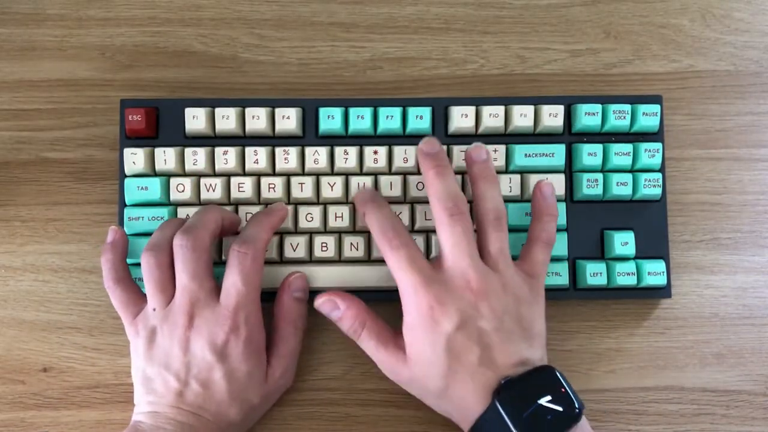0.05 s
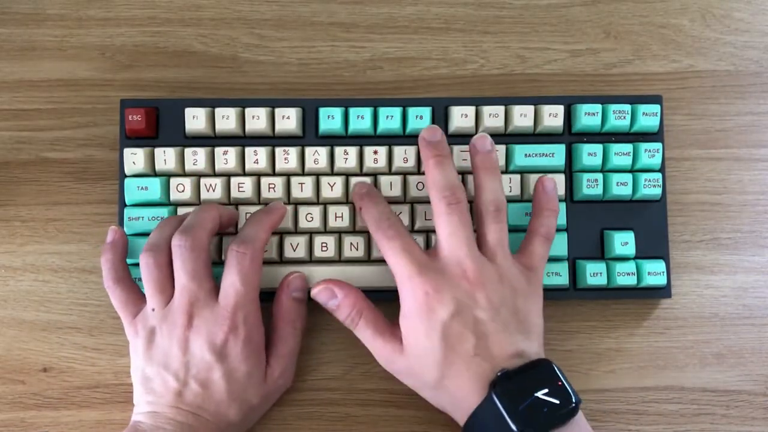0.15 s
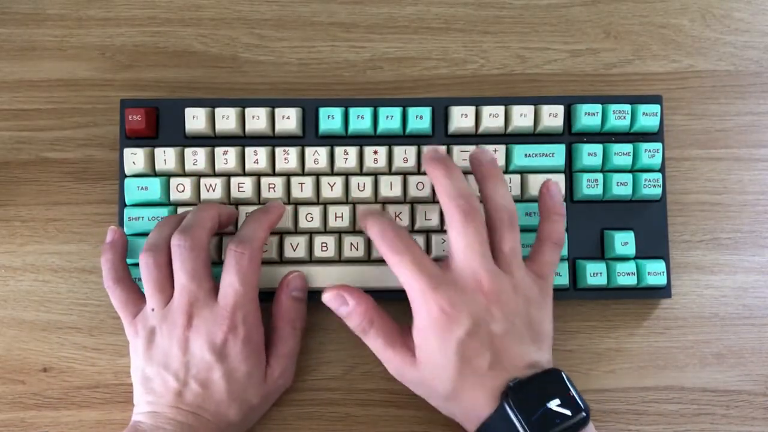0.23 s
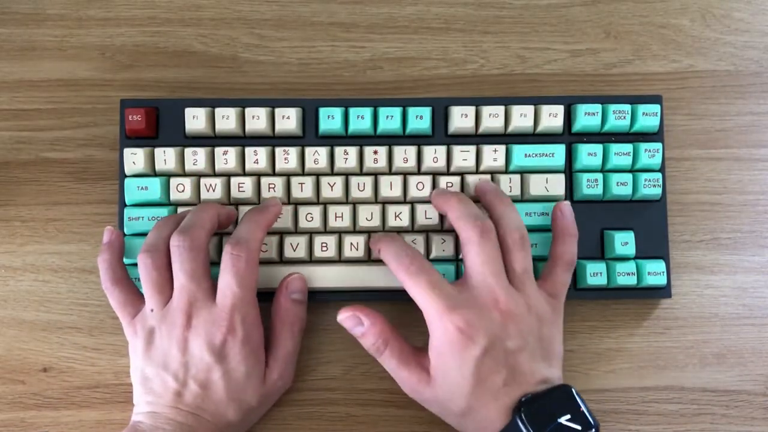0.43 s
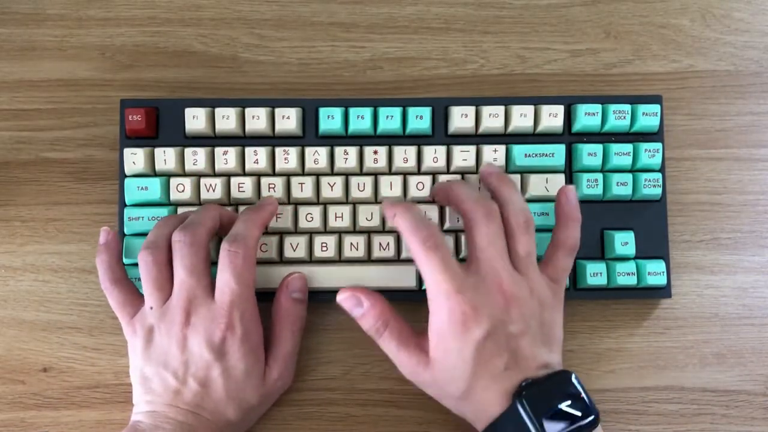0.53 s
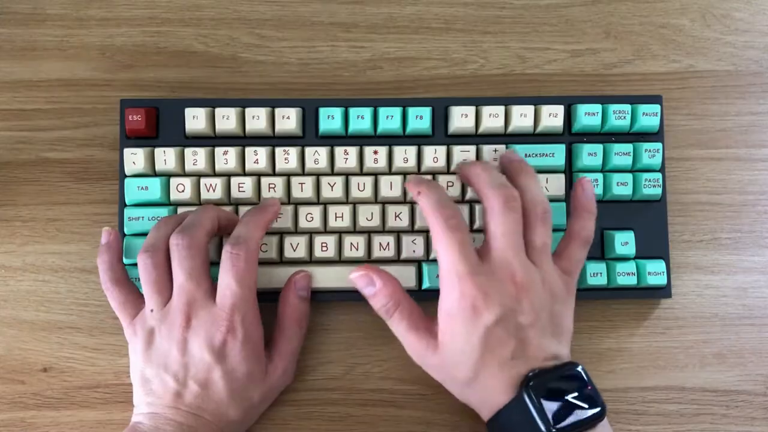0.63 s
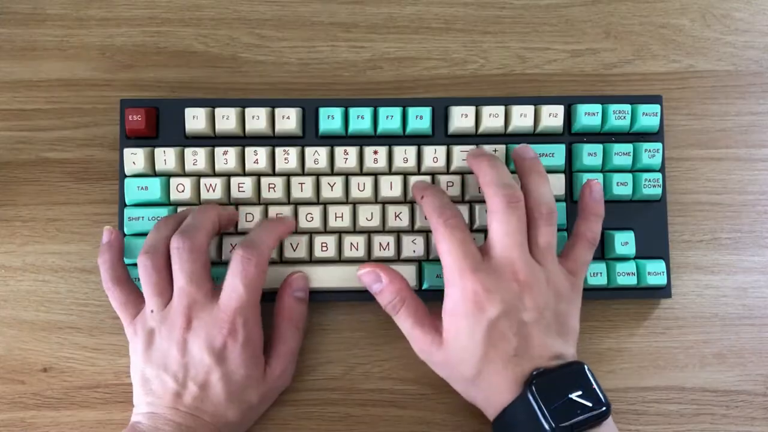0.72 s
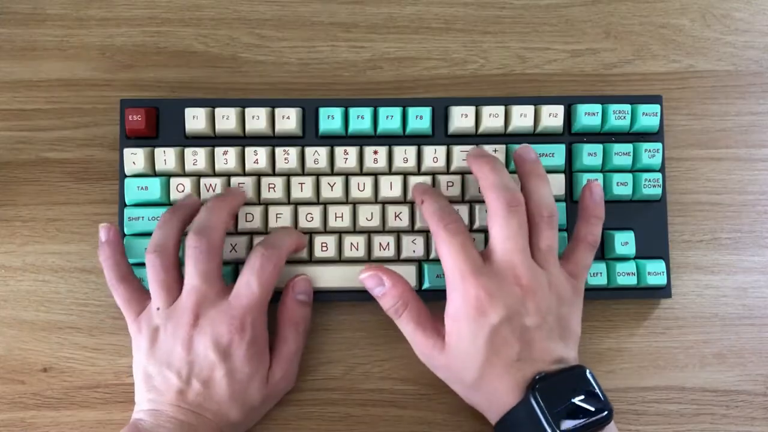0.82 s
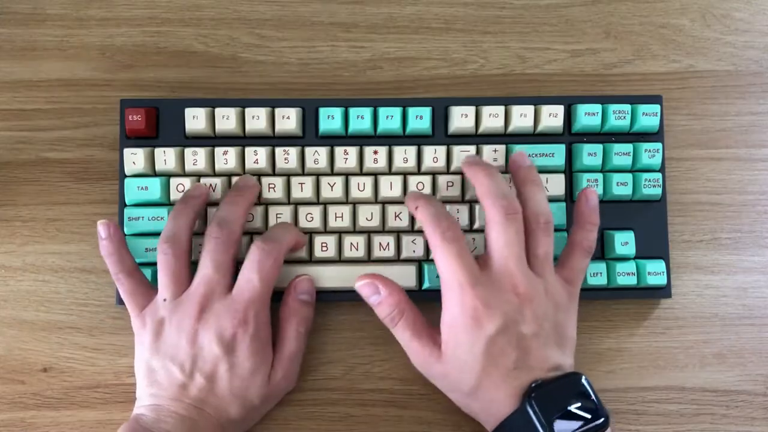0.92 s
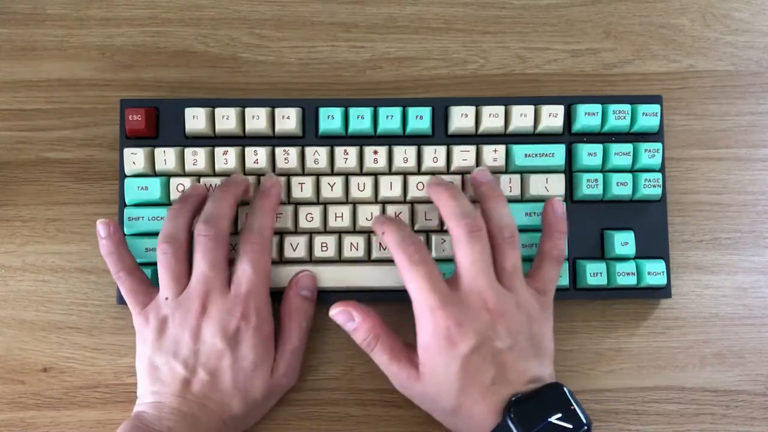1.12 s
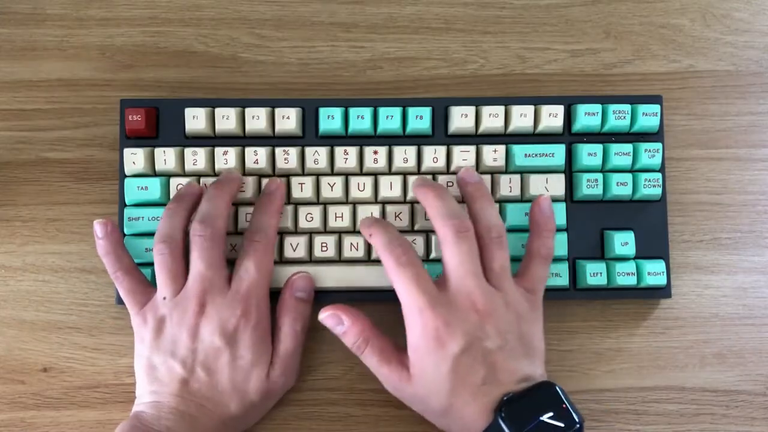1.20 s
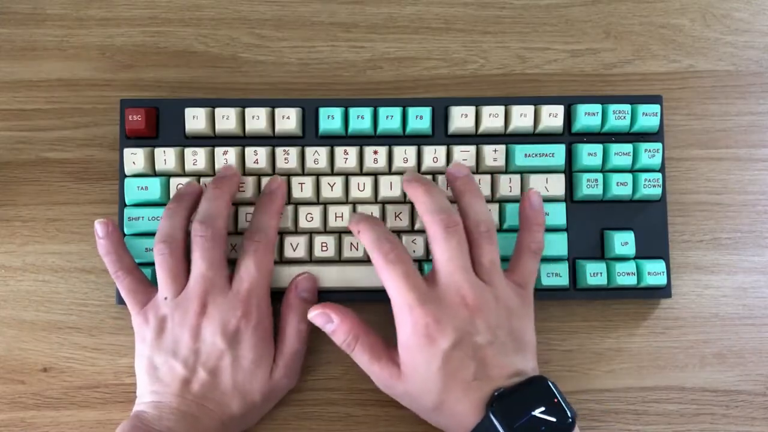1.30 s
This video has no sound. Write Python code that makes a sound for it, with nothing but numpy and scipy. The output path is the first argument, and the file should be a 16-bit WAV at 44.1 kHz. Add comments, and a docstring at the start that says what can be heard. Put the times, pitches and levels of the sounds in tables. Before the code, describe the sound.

A mechanical keyboard is typed on quickly, bright snaps and plastic keycap knocks in uneven clusters, with faint spring ringing and low wooden desk thumps; close, dry indoor pickup with low room tone.

```python
"""Fast typing on a clicky mechanical keyboard on a wooden desk in a quiet room.
Clicks: noise bursts through two resonances plus hiss, with a spring that sings on. Clacks: ragged blows
ringing keycap, case and plate, over low modes of tray and desk. Rustle and room tone: shaped noise.
The desk top booms; one wide key leaves a thin ring. A faint twin leads every sound by 17 ms.
The sound stops at 1.2 s."""
import sys
import numpy as np
from scipy import signal
from scipy.fft import rfft, irfft
from scipy.io import wavfile
from scipy.ndimage import uniform_filter1d

SR = 44100
rng = np.random.default_rng(int(sys.argv[2]) if len(sys.argv) > 2 else 0)


def unload_audio(sound):
    """Save the sound as a 16-bit wav file, at the path given as the first command line argument."""
    columns = np.transpose(np.atleast_2d(sound))
    # keep every value between -1 and 1, then stretch to whole-number steps
    steps = np.round(np.clip(columns, -1, 1) * 32767)
    wavfile.write(sys.argv[1], SR, steps.astype(np.int16))


N = 59535

# Room tone spectrum. Each row: frequency [Hz], relative density [dB per Hz].
ROOM_TONE_SPECTRUM = [(25, -4.5), (50, -2.5), (70, -17), (100, -12.5), (125, -11), (170, -20), (250, -15),
                      (500, -28), (800, -25), (2000, -34.5), (4000, -40), (8000, -54), (16000, -70)]
# Boom of the desk top as the hands shake it. Each row: time [s], rms level [dB], frequency [Hz].
DESK_BOOM = [(0.0, -44.5, 63.6), (0.032, -47, 60.4), (0.174, -63.5, 65.9), (0.278, -48.5, 64.3),
             (0.37, -60, 65.7), (0.4, -43.5, 64.7), (0.56, -52.5, 66.35), (0.586, -71, 65),
             (0.626, -45, 65.7), (0.692, -48, 64.65), (0.724, -57, 67.4), (0.824, -48.5, 64.4),
             (0.878, -56.5, 63), (0.934, -46.5, 64.5), (1.01, -70, 63.1), (1.06, -54.5, 60.8),
             (1.112, -46, 62.7), (1.19, -55.5, 65.5)]
# Switch clicks and rattles. Each row: start [s], peak of a sine with the energy of the high ring [dB],
# high ring [Hz], low ring level re high [dB], low ring [Hz], t60 [s].
SWITCH_CLICKS = [(0.014, -54.5, 8100, 10.5, 7700, 0.035), (0.0265, -54, 9700, 13, 4760, 0.038),
                 (0.237, -33.5, 12300, 2, 3980, 0.011), (0.2446, -19.5, 10670, -10.5, 5800, 0.015),
                 (0.319, -32.5, 11300, -4, 6460, 0.012), (0.325, -39, 12200, 11.5, 4070, 0.034),
                 (0.38, -26, 13000, -16, 6640, 0.035), (0.3815, -20.5, 10270, -7, 5132, 0.024),
                 (0.3912, -51, 10320, 12, 6680, 0.028), (0.412, -62, 12970, 15, 5300, 0.023),
                 (0.4717, -44, 9700, 3, 3900, 0.047), (0.4792, -32, 11870, 9.5, 5360, 0.0074),
                 (0.499, -31, 11400, -3, 5240, 0.024), (0.501, -23.5, 12130, -20, 6390, 0.012),
                 (0.5052, -16, 11650, -3.5, 5230, 0.0062), (0.5085, -35, 11230, 1, 7390, 0.024),
                 (0.515, -34, 10480, -2, 4077, 0.033), (0.6193, -24.5, 12530, -26, 5590, 0.03),
                 (0.622, -33, 12200, 4.5, 5800, 0.025), (0.6285, -7, 10090, -3, 5440, 0.012),
                 (0.6292, -27, 12340, -7.5, 7810, 0.017), (0.7475, -47, 9400, 11, 5500, 0.012),
                 (0.752, -25.5, 10400, 8.5, 5860, 0.0074), (0.7545, -48.5, 10300, 8, 3900, 0.0089),
                 (0.799, -44.5, 12940, 20.5, 5770, 0.0053), (0.802, -60.5, 12000, 4, 5390, 0.0092),
                 (0.8868, -24.5, 11820, -4.5, 5376, 0.018), (0.8908, -23.5, 10360, -0.5, 3945, 0.029),
                 (0.9543, -35.5, 10010, 6.5, 5940, 0.0075), (0.961, -38.5, 11160, 8.5, 5225, 0.015),
                 (1.0318, -36.5, 13870, -3, 4640, 0.019), (1.039, -40, 11000, 1.5, 5040, 0.0091),
                 (1.0454, -24, 10850, 3, 5410, 0.01), (1.13, -34, 11630, 5, 5730, 0.0073),
                 (1.135, -32, 11620, 0.5, 4650, 0.03), (1.145, -41.5, 13960, 3, 5900, 0.014),
                 (1.1516, -33.5, 9820, 5, 5110, 0.014), (1.161, -17.5, 14070, -7.5, 6950, 0.012),
                 (1.178, -34, 9930, 6.5, 5590, 0.0074)]
# Keycaps landing. Each row: start [s], nominal cap peak [dB], cap [Hz], cap t60 [s], second ring [Hz],
# second ring re cap [dB], case re cap [dB], chatter share of blow energy [0-1], desk thud [dB], tray [dB].
KEYCAP_LANDINGS = [(0.0282, -44.5, 1937, 0.048, 2920, 14.5, 2, 0.9, -44, -46),
                   (0.2525, -20, 2020, 0.012, 3000, 7.5, -7.5, 0.13, -45, -48),
                   (0.327, -26, 2120, 0.016, 2940, -27, 4, 0.6, -36, -41),
                   (0.334, -36, 2070, 0.016, 2870, -7, 1.5, 0.6, -48, -46),
                   (0.391, -19, 1890, 0.019, 3056, 4.5, -4, 0.3, -42.5, -47.5),
                   (0.481, -36, 2290, 0.0064, 3460, -3, -2, 0.2, -55, -40),
                   (0.483, -33, 2030, 0.0053, 3000, 6, 4, 0.4, -41.5, -75),
                   (0.495, -34, 1904, 0.016, 2660, -17, -3, 0.9, -51, -40.5),
                   (0.511, -22, 2540, 0.0079, 2763, -8, -1, 0.6, -44, -43.5),
                   (0.6279, -24, 1899, 0.054, 3720, -15, 2, 1, -39.5, -41.5),
                   (0.6367, -12, 1887, 0.035, 2612, -12, -13, 0.63, -33, -32.5),
                   (0.7624, -19, 1880, 0.016, 3326, 4, -13.5, 0, -40, -43),
                   (0.802, -38, 1970, 0.039, 3330, -6, -1, 0.4, -42.5, -47),
                   (0.897, -19, 2030, 0.0083, 2546, 4.5, -0.5, 0.37, -38, -36),
                   (0.962, -33, 2200, 0.011, 2620, 5.5, -1, 0.64, -42.5, -42.5),
                   (1.033, -40.5, 2050, 0.015, 2720, 11, -1.5, 0.8, -45.5, -51.5),
                   (1.056, -18.5, 1775, 0.017, 3300, 0, -15, 0.45, -44, -45.5),
                   (1.138, -34.5, 2424, 0.031, 3100, -5, -4.5, 0.9, -42, -36.5),
                   (1.1746, -14, 2040, 0.01, 3402, -15.5, -18, 0.29, -47, -57.5)]
# Modes of case and plate, of the desk, and of the tray under the keys.
# Each row: nominal frequency [Hz], nominal relative level [dB], t60 [s].
CASE_MODES = [(999, -5, 0.017), (1157, -8, 0.032), (1306, -5, 0.01), (1616, -2.5, 0.014),
              (2484, -1.5, 0.0061), (2750, -12, 0.0083), (3010, 5.5, 0.005), (4460, -8, 0.015),
              (5500, -10, 0.013)]
DESK_MODES = [(116.7, -5, 0.13), (177, 2, 0.071), (239.8, -10.5, .12)]
TRAY_MODES = [(339.2, -2.5, 0.18), (406, -1, 0.071), (577, -12.5, 0.061), (782, -9.5, 0.18)]
# Spectrum of the rustle that trails the keys. Each row: frequency [Hz], relative density [dB per Hz].
RUSTLE_SPECTRUM = [(500, -9), (900, -2.5), (1600, -2.5), (2300, -2), (3200, 0.5), (4200, -11.5),
                   (6500, -15.5), (10000, -26.5), (16000, -26.5)]
# Thin ring left behind by one wide key. Each row: start [s], level before its onset and decay [dB].
WIDE_KEY_RINGS = [(0.611, -44), (.639, -30.5), (.765, -46), (.803, -42.5)]

ROOM_TONE_DB = -52
HISS_DB, HIGH_WIDTH_HZ, LOW_WIDTH_HZ, CLICK_RISE_S = -11.5, 300, 1500, 0.00016
SPRING_HZ, SPRING_T60_S, SPRING_REACH_HZ = 10310, 0.23, 1500
SPRING_DB, SPRING_DB_PER_CLICK_DB = -37, 0.65  # SPRING_DB: at a 0 dB click on the spring's pitch
SECOND_T60_S, CHATTER_T60_S, THUD_RISE_S = 0.0078, 0.014, 0.011
KNOCK_DB, KNOCK_T60_S, CLACK_HIGHPASS_HZ = -10.5, 0.0066, 787
ROOM_DB, ROOM_T60_S, ROOM_RISE_S, ROOM_LOW_HZ, ROOM_TOP_HZ = -28, 0.3, 0.0071, 500, 4000
RUSTLE_DB, RUSTLE_GROWTH, RUSTLE_T60_S = -25.5, 0.6, 0.22  # growth: rustle dB per key dB
RING_HZ, RING_T60_S, RING_RISE_S = 1910, 0.13, 0.002
TWIN_DB, TWIN_LEAD_S, END_S, TOP_HZ = -12.5, 768 / 44100, 1.1982, 15800


def undb(db):
    """Amplitude from dB."""
    return 10 ** (np.asarray(db) / 20)


def seconds(duration_s):
    """Time axis in seconds."""
    return np.arange(int(duration_s * SR)) / SR


def fall(t, t60_s):
    """Exponential decay by 60 dB in t60_s."""
    return np.exp(-np.log(1000) * t / t60_s)


def rise(t, rise_s):
    """Exponential onset with time constant rise_s."""
    return 1 - np.exp(-t / rise_s)


def add(out, start_s, x):
    """Mix x into out from start_s, cut at the end of out."""
    k = int(start_s * SR)
    x = x[:N - k]
    out[k:k + len(x)] += x


def resonant_noise(n, hz, width_hz):
    """White noise through one resonance, at unit rms."""
    b, a = signal.iirpeak(hz, hz / width_hz, fs=SR)
    y = signal.lfilter(b, a, rng.standard_normal(n))
    return y / np.std(y)


def burst(noise, envelope):
    """Enveloped noise with about the energy of a unit-peak sine under that envelope."""
    shaped = noise * envelope
    return shaped * np.sqrt(np.sum(envelope ** 2) / np.sum(shaped ** 2) / 2)


def coloured_noise(spectrum):
    """Steady noise of unit rms; density interpolated over log frequency."""
    hz = np.arange(N // 2 + 1) * SR / N
    point_hz, point_db = np.array(spectrum).T
    gain = undb(np.interp(np.log(hz + 1), np.log(point_hz), point_db))
    x = irfft(rfft(rng.standard_normal(N)) * gain, N)
    return x / np.std(x)


def modes(table, t):
    """Fading sines after one blow, neighbours in opposite phase, level and pitch varying per blow."""
    out = np.zeros(len(t))
    for k, (hz, db, t60_s) in enumerate(table):
        level_luck, pitch_luck = rng.standard_normal(2)
        level = undb(db + 1.5 * level_luck)
        sine = np.sin(2 * np.pi * hz * (1 + 0.014 * pitch_luck) * t)
        out += (-1) ** k * level * fall(t, t60_s) * sine
    return out


def struck(blow, table, t):
    """Modes rung by a ragged blow, each keeping the energy one clean blow gives it."""
    out = np.zeros(len(t))
    for k, row in enumerate(table):
        clean = modes([row], t)
        rung = signal.fftconvolve(blow, clean)[:len(t)]
        out += (-1) ** k * rung * np.sqrt(np.sum(clean ** 2) / np.sum(rung ** 2))
    return out


def room_tone():
    """Steady noise, densest in the bass."""
    return undb(ROOM_TONE_DB) * coloured_noise(ROOM_TONE_SPECTRUM)


def desk_boom():
    """Lowest mode of the desk top: one sine that swells, sinks and drifts in pitch."""
    at_s, db, hz = np.array(DESK_BOOM).T
    t = np.arange(N) / SR
    phase = 2 * np.pi * np.cumsum(np.interp(t, at_s, hz)) / SR
    level = np.sqrt(2) * undb(np.interp(t, at_s, db))
    return level * np.sin(phase + 2 * np.pi * rng.random())


def spring(click_db, click_hz):
    """Spring singing on after a click, stronger for loud clicks near its pitch."""
    t = seconds(0.2)
    level = undb(SPRING_DB_PER_CLICK_DB * click_db + SPRING_DB)
    coupling = 1 / (1 + ((click_hz - SPRING_HZ) / SPRING_REACH_HZ) ** 2)
    return level * coupling * fall(t, SPRING_T60_S) * resonant_noise(len(t), SPRING_HZ, 250)


def clicks():
    """Short rattles ring two small resonances over broad hiss, and excite the spring."""
    out, t = np.zeros(N), seconds(0.05)
    for start_s, db, high_hz, low_db, low_hz, t60_s in SWITCH_CLICKS:
        envelope = rise(t, CLICK_RISE_S) * fall(t, t60_s)
        high = burst(resonant_noise(len(t), high_hz, HIGH_WIDTH_HZ), envelope)
        low = undb(low_db) * burst(resonant_noise(len(t), low_hz, LOW_WIDTH_HZ), envelope)
        hiss = undb(HISS_DB) * burst(resonant_noise(len(t), 11000, 11000), envelope)
        add(out, start_s, undb(db) * (high + low + hiss))
        add(out, start_s, spring(db, high_hz))
    return out


def ragged_blow(t, chatter):
    """Unit impulse sharing its energy with a fading chatter of small contacts."""
    blow = rng.standard_normal(len(t)) ** 3 * fall(t, CHATTER_T60_S)  # cubed: sparse peaks
    blow *= np.sqrt(chatter / np.sum(blow ** 2))
    blow[0] += np.sqrt(1 - chatter)
    return blow


def clacks():
    """Landing blows ring cap and case with a noise knock; highpassed."""
    out, t = np.zeros(N), seconds(0.1)
    for start_s, db, hz, t60_s, second_hz, second_db, case_db, chatter, _, _ in KEYCAP_LANDINGS:
        blow = ragged_blow(t, chatter)
        cap = struck(blow, [(hz, 0, t60_s), (second_hz, second_db, SECOND_T60_S)], t)
        case = undb(case_db) * struck(blow, CASE_MODES, t)
        knock = undb(KNOCK_DB) * burst(resonant_noise(len(t), 6000, 9000), fall(t, KNOCK_T60_S))
        add(out, start_s, -undb(db) * (cap + case + knock))
    highpass = signal.butter(3, CLACK_HIGHPASS_HZ, "highpass", fs=SR, output="sos")
    return signal.sosfilt(highpass, out)


def thuds():
    """Each landing rings the low modes of desk and tray with a soft onset."""
    out, t = np.zeros(N), seconds(0.5)
    for row in KEYCAP_LANDINGS:
        start_s, desk_db, tray_db = row[0], row[-2], row[-1]
        low = undb(desk_db) * modes(DESK_MODES, t) + undb(tray_db) * modes(TRAY_MODES, t)
        add(out, start_s, low * rise(t, THUD_RISE_S))
    return out


def room_tail(keys):
    """Keys convolved with fading bandpassed noise of unit energy."""
    t = seconds(0.5)
    b, a = signal.butter(1, [ROOM_LOW_HZ, ROOM_TOP_HZ], "bandpass", fs=SR)
    tail = signal.lfilter(b, a, rng.standard_normal(len(t))) * fall(t, ROOM_T60_S)
    tail *= np.clip(t / ROOM_RISE_S, 0, 1)
    tail /= np.sqrt(np.sum(tail ** 2))
    return undb(ROOM_DB) * signal.fftconvolve(keys, tail)[:N]


def rustle(keys):
    """Diffuse noise trailing the keys; its level grows more slowly than theirs."""
    smooth_power = np.maximum(uniform_filter1d(keys ** 2, size=128), 0)  # no negative rounding
    tail = fall(seconds(0.5), RUSTLE_T60_S) ** 2
    power = signal.fftconvolve(smooth_power ** RUSTLE_GROWTH, tail / np.sum(tail))[:N]
    return undb(RUSTLE_DB) * np.sqrt(np.abs(power)) * coloured_noise(RUSTLE_SPECTRUM)


def rings():
    """One clean sine per ring, with a fast onset and long decay."""
    out, t = np.zeros(N), seconds(0.25)
    tone = rise(t, RING_RISE_S) * fall(t, RING_T60_S) * np.sin(2 * np.pi * RING_HZ * t)
    for start_s, db in WIDE_KEY_RINGS:
        add(out, start_s, undb(db) * tone)
    return out


def scene():
    """Keys with room tail and rustle, wide-key rings, desk and room tone; one channel."""
    keys = clicks() + clacks()
    desk = thuds() + desk_boom()
    return (room_tone() + desk + keys + room_tail(keys) + rustle(keys) + rings())[None]


def record(dry):
    """Add the faint early twin, stop at END_S, lowpass at TOP_HZ."""
    lead = round(TWIN_LEAD_S * SR)
    twin = undb(TWIN_DB) * np.pad(dry[:, lead:], ((0, 0), (0, lead)))
    stopped = (dry + twin) * (np.arange(N) < END_S * SR)
    lowpass = signal.ellip(8, 0.2, 80, TOP_HZ, fs=SR, output="sos")
    return signal.sosfilt(lowpass, stopped)


dry = scene()
out = record(dry)
unload_audio(out)
```